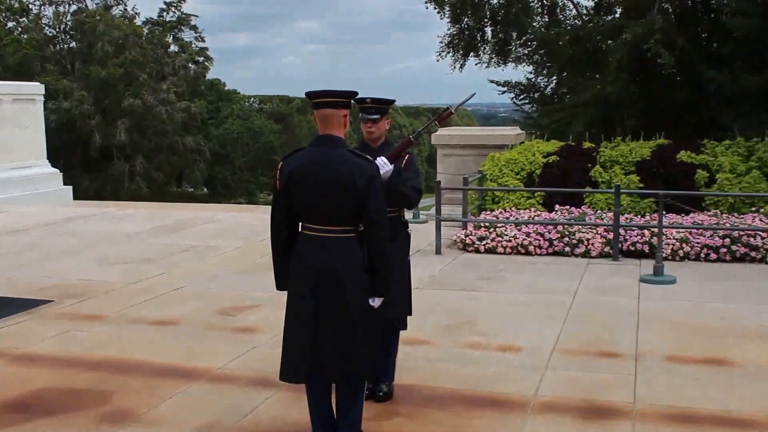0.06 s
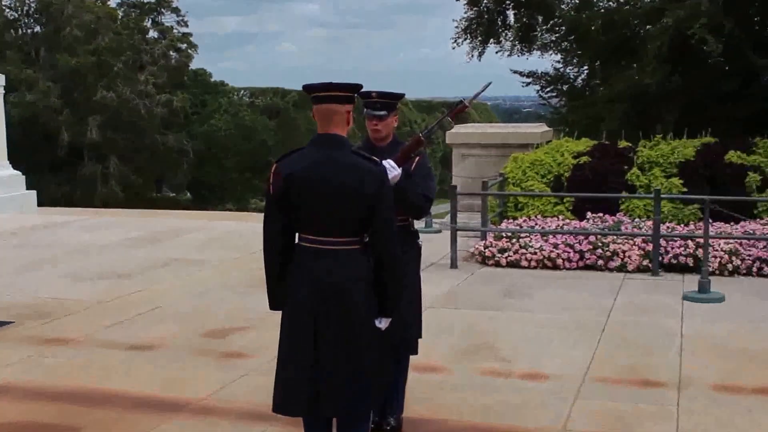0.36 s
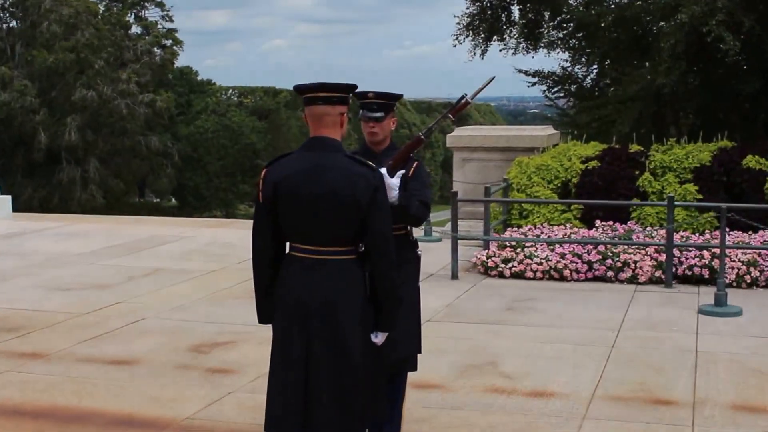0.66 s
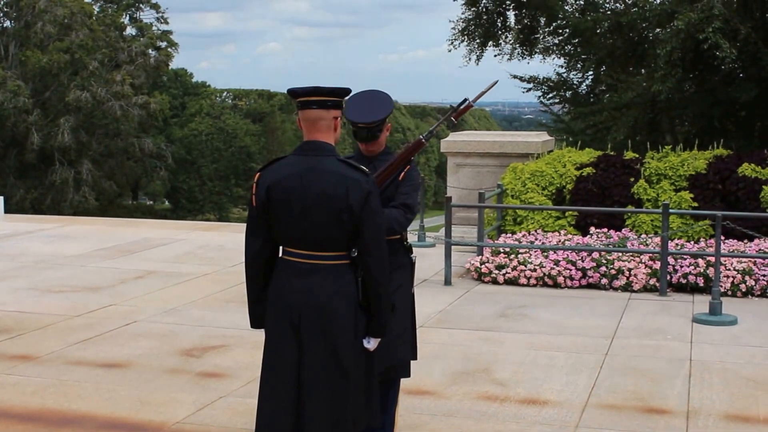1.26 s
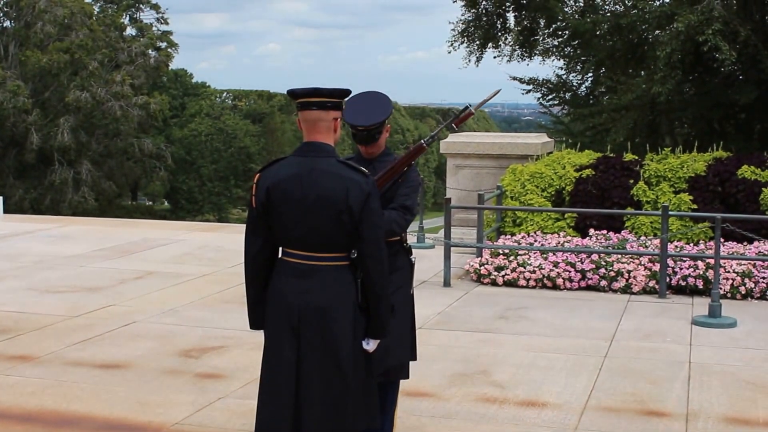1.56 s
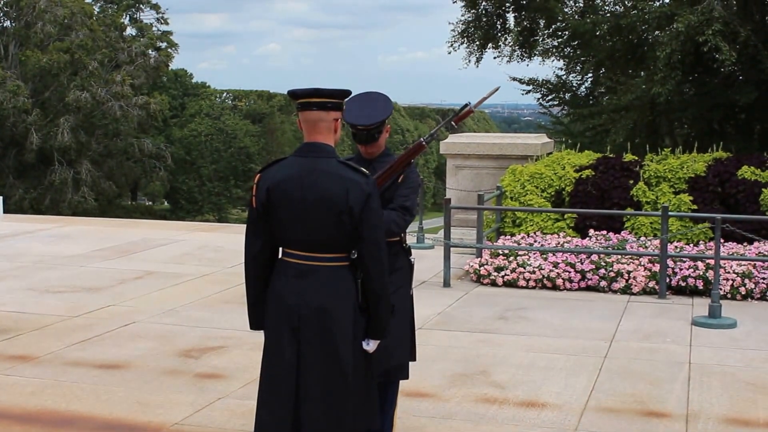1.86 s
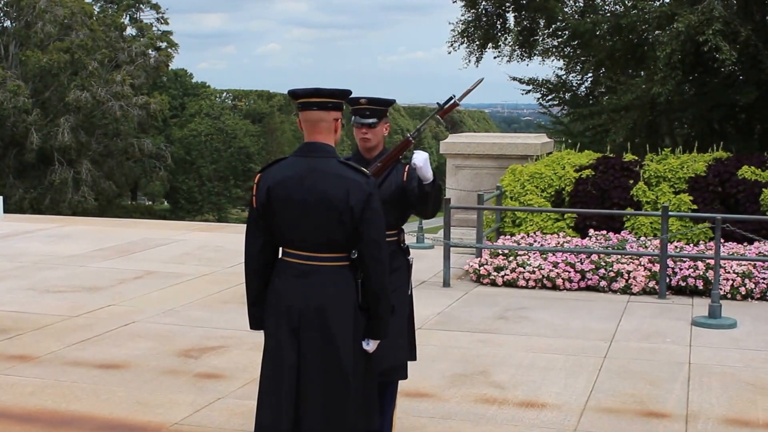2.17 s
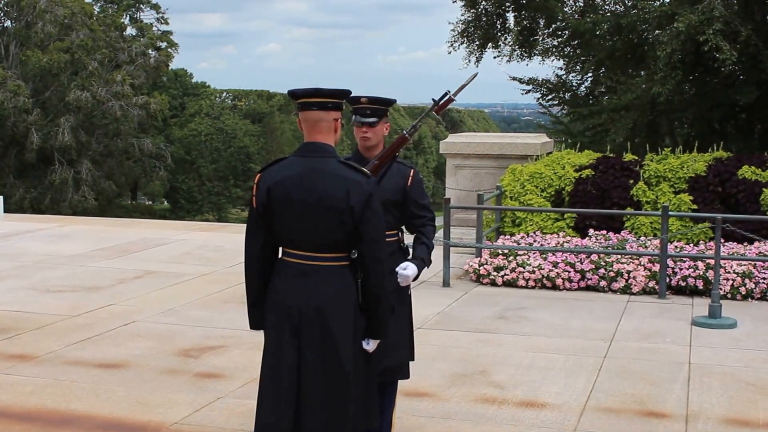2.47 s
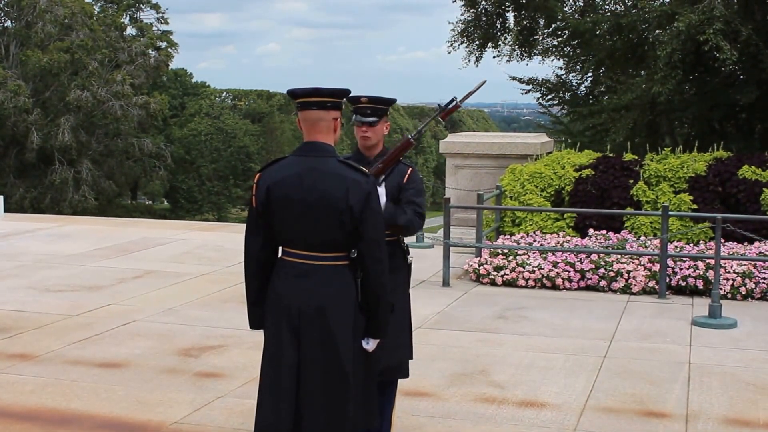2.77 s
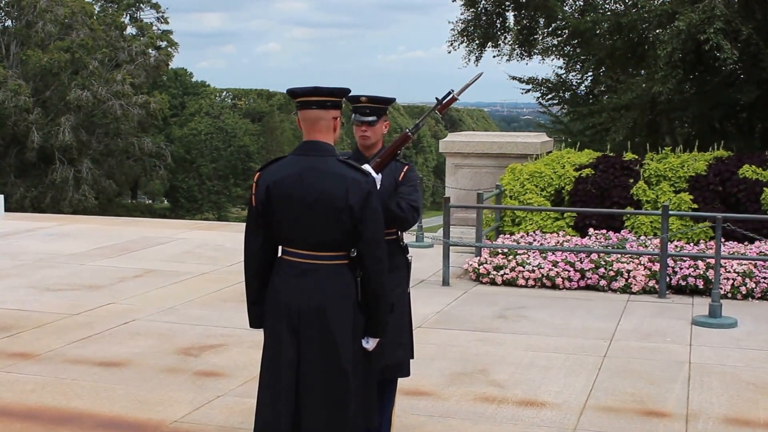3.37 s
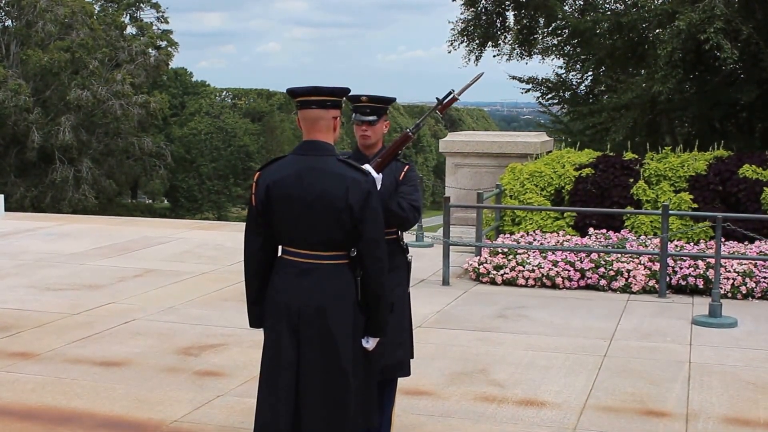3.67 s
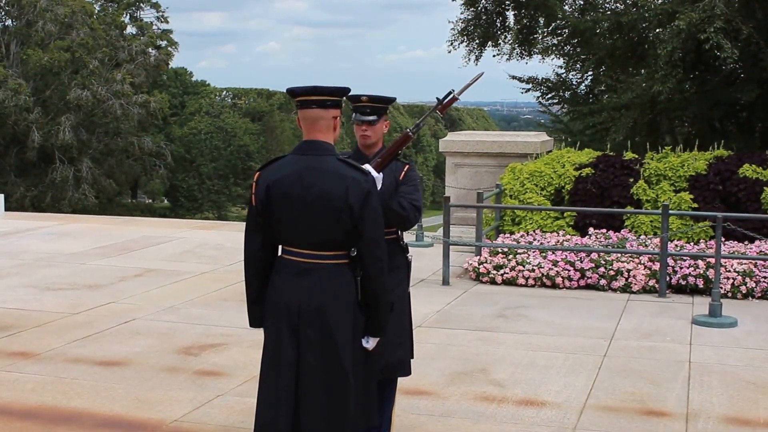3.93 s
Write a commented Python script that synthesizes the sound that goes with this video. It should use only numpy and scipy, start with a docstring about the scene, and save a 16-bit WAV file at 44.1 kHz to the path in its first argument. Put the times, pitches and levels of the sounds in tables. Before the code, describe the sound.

A rifle bolt rattles open and snaps shut with sharp metallic cracks, followed by a gloved slap and one final clack. Each echoes briefly across an outdoor plaza, over wind buffeting the microphone, faint chirps and distant city rumble.

```python
"""An open stone plaza, where a guard handles a rifle. Gloves slap the stock; the bolt clatters open,
slams shut, and a last sharp clack follows, each contact a crack that rings steel and wood.
Stone walls answer a tenth of a second later. Short dry rasps sound to the right and faint birds whistle.
Wind buffets the microphone over a distant city rumble, and a limiter ducks after the loudest blows."""
import sys
import numpy as np
from scipy import signal
from scipy.io import wavfile
from scipy.ndimage import uniform_filter1d

SR = 44100
rng = np.random.default_rng(int(sys.argv[2]) if len(sys.argv) > 2 else 0)


def waveform_to_disk(signal):
    """Save audio, clipped to [-1, 1], as 16-bit WAV at the path in sys.argv[1]."""
    frames = np.transpose(np.atleast_2d(signal))
    scaled = np.clip(frames, -1, 1) * 32767
    samples = np.round(scaled).astype(np.int16)
    wavfile.write(sys.argv[1], SR, samples)


N = 176400
T = np.arange(N) / SR
EDGES = np.geomspace(22, 17000, 24)   # noise bands, Hz
CENTRES = np.sqrt(EDGES[1:] * EDGES[:-1])
BANK = [signal.butter(2, edge, "band", fs=SR, output="sos") for edge in zip(EDGES, EDGES[1:])]
RIFLE_LIKENESS = 0.86   # the rifle's noise is nearly the same in both ears
CHATTER_S = 0.00057   # a blow chatters on before it dies


def from_db(db):
    return 10 ** (np.asarray(db) / 20)


def unit_rms(x):
    return x / np.sqrt(np.mean(x ** 2) + 1e-20)


def per_band(curve):
    """A frequency curve's value at each band centre."""
    hz, values = np.transpose(curve)
    return np.interp(np.log(CENTRES), np.log(hz), values)


def drift(rate_hz):
    """Smooth random wobble with an RMS of 1."""
    step, lead = 40, 2000
    pole = np.exp(-2 * np.pi * rate_hz * step / SR)
    slow = signal.lfilter([1], [1, -2 * pole, pole ** 2], rng.standard_normal(N // step + lead + 2))[lead:]
    return np.interp(np.arange(N) / step, np.arange(len(slow)), unit_rms(slow))


def add(out, start, sound):
    """Mix a sound in at its start in seconds."""
    i = max(int(start * SR), 0)
    out[:, i:i + sound.shape[-1]] += sound[..., :N - i]


def noise_bands(size, likeness):
    """Stereo noise, bands x 2 x size; likeness is the left-right correlation, overall or per band."""
    lead = size // 40
    mid, side = rng.standard_normal((2, 2, 1, size + lead))
    bands = []
    for k, c in enumerate(np.clip(likeness, -.99, .99) * np.ones(len(BANK))):
        white = np.sqrt((1 + c) / 2) * mid[k % 2] + np.sqrt((1 - c) / 2) * side[k % 2] * [[1], [-1]]
        bands.append(signal.sosfilt(BANK[k], white)[:, lead:])
    return np.array(bands)


def colour(eq, tilt_db=0):
    """Band gains for an EQ curve, tilted per octave and rolled off below its first point; total power 1."""
    gain = from_db(per_band(eq) + tilt_db * np.log2(CENTRES)) * np.minimum(CENTRES / eq[0][0], 1) ** 2
    power = np.sum(gain ** 2 * np.diff(EDGES)) * 2 / SR
    return (gain / np.sqrt(power))[:, None, None]


def eq_noise(size, likeness, eq, tilt_db=0):
    """Stereo noise shaped by an EQ curve."""
    return np.sum(noise_bands(size, likeness) * colour(eq, tilt_db), axis=0)


def decay(t, t60):
    """Holds at 1 until t = 0, then falls 60 dB every t60 seconds."""
    return np.exp(-np.log(1000) * np.maximum(t, 0) / t60)


def ring(modes, t, scatter_db=1.5, detune=.002):
    """Struck modes; strength and pitch shift a little with every blow and grip."""
    hz, db, t60 = np.transpose(modes)[:, :, None]
    strength = from_db(db + scatter_db * rng.standard_normal(hz.shape)) * rng.choice([-1, 1], hz.shape)
    hz = hz * (1 + detune * rng.standard_normal(hz.shape))
    return np.sum(strength * np.sin(2 * np.pi * hz * t) * decay(t, t60), axis=0)


# The far city's rumble, then the hiss of traffic and leaves. Each row: frequency in Hz, EQ in dB.
RUMBLE_EQ = [(25, -16), (45, -2.5), (80, 0), (150, -1.5), (260, -4.5), (400, -13.5), (700, -45),
             (1500, -59)]
HISS_EQ = [(290, -11.5), (500, -2), (819, -2), (880, -9.5), (1180, -6.5), (2430, -21), (3920, -22.5),
           (4470, -24), (16000, -41.5)]
# The bed's stereo image. Each row: frequency in Hz, left-right likeness.
BED_LIKENESS = [(100, 1), (700, 0.94), (1300, 0.78), (2400, 0.25), (4500, 0), (9000, 0)]


def city_bed(rumble_db=-34.5, hiss_db=-42):
    """A steady bed of far rumble and hiss, centred in the bass and wide in the treble."""
    rumble = from_db(rumble_db) * colour(RUMBLE_EQ) * (CENTRES < RUMBLE_EQ[-1][0])[:, None, None]
    hiss = from_db(hiss_db) * colour(HISS_EQ)
    return np.sum(noise_bands(N, per_band(BED_LIKENESS)) * np.hypot(rumble, hiss), axis=0)


# The rise and fall of the gusts. Each row: time in seconds, relative level in dB.
GUSTS = [(0, -13.5), (.17, -22.5), (.26, -12), (.68, -22), (.75, -28), (.8, -18.5), (.87, -20), (1.0, -33),
         (1.35, -36), (1.45, -21), (1.6, -33.5), (1.75, -29), (1.9, -48), (2.25, -55), (2.65, -29.5),
         (2.85, -20), (3.15, -20), (3.4, -31.5), (3.66, -22), (3.82, -36.5), (3.875, -21), (4, -35.5)]
# The wind's low end. Each row: frequency in Hz, EQ in dB.
WIND_EQ = [(25, 4), (40, -11), (65, 9.5), (100, 3.5), (160, -0.5), (240, -14), (350, -24), (500, -55),
           (900, -84)]
# Single thumps of air. Each row: centre in seconds, level on the right in dB, pitch in Hz.
BUFFETS = [(.144, -3, 97), (0.217, 1.5, 233), (.270, 3, 162), (.390, -3.5, 172), (0.702, -4, 121),
           (1.463, -10, 146), (3.06, 2.5, 155), (3.701, -2, 197)]


def wind(level_db=-2.5, brightening=0.43, buffet_cycles=0.46):
    """Wind pushes the microphone's two ports against each other: lumpy low noise, brighter in gusts."""
    gust_db = np.interp(T, *np.transpose(GUSTS))
    flutter_db = 3 * drift(21.4)
    force_db = gust_db - gust_db.mean() + flutter_db
    out = np.zeros((2, N))
    for hz, band in zip(CENTRES, noise_bands(N, likeness=-0.64) * colour(WIND_EQ)):
        if hz < WIND_EQ[-1][0]:
            out += band * from_db(brightening * np.log2(hz / 100) * force_db)
    out *= from_db(level_db + gust_db + flutter_db)
    t = T[:SR // 10] - 1 / 20
    for centre, db, hz in BUFFETS:
        thump = -from_db(db) * np.cos(2 * np.pi * hz * t) * np.exp(-(t * hz / buffet_cycles) ** 2)
        add(out, centre + t[0], thump * [[-0.37], [1]])   # a weaker, opposite push on the left
    return out


# Bird calls. Each row: start and length in seconds, first and last pitch in Hz, level in dB.
CHIRPS = [(0.186, 0.11, 4360, 4430, -58), (0.347, 0.049, 4250, 4900, -50), (0.645, .09, 4670, 4450, -59),
          (0.728, 0.12, 3780, 3320, -57), (0.814, 0.11, 4800, 5100, -54), (1.948, 0.044, 4400, 4450, -48),
          (2.641, 0.031, 3920, 3920, -49), (3.63, .04, 4400, 5300, -53)]


def birds(waver_hz=170):
    """Faint, thin whistles that glide and waver."""
    out = np.zeros((2, N))
    for start, length, first_hz, last_hz, db in CHIRPS:
        size = int(length * SR)
        hz = np.linspace(first_hz, last_hz, size) + waver_hz * drift(116)[:size]
        add(out, start, from_db(db) * np.hanning(size) * np.sin(2 * np.pi * np.cumsum(hz) / SR))
    return out


# Dry rasps. Each row: start in seconds, time until the fade in seconds, level in dB.
RASPS = [(1.567, 0.032, -24), (1.721, 0.027, -29), (1.857, 0.024, -26.5), (1.981, 0.062, -24)]
# Their hiss. Each row: frequency in Hz, EQ in dB.
RASP_EQ = [(500, -22), (1200, -5), (1500, -5.5), (2100, 1.5), (2700, -5.5), (4100, -6.5), (5200, -26.5),
           (9000, -25), (15000, -45)]
# Their resonances. Each row: centre in Hz, width in Hz, gain in dB.
RASP_PEAKS = [(2000, 320, 0), (2550, 340, 4.5), (3140, 460, -4), (4126, 150, -2.5)]


def rasps(attack_s=0.015, t60=0.12, hiss_db=-5.5, peaks_db=-5, grain_db=2.5):
    """Grainy bursts of hiss and four noisy resonances, a little to the right."""
    hiss = eq_noise(N, likeness=0.22, eq=RASP_EQ)
    white = rng.standard_normal((2, N))
    peaks = envelope = 0
    for hz, width_hz, db in RASP_PEAKS:
        b, a = signal.iirpeak(hz, hz / width_hz, fs=SR)
        peaks += from_db(db) * signal.lfilter(b, a, signal.lfilter(b, a, white))
    for start, hold, db in RASPS:
        envelope += from_db(db) * np.clip((T - start) / attack_s, 0, 1) * decay(T - start - hold, t60)
    voice = from_db(hiss_db) * hiss + from_db(peaks_db) * unit_rms(peaks)
    return voice * envelope * from_db(grain_db * drift(280)) * from_db([[0], [1.5]])


# The swell of early reflections. Each row: delay in seconds, relative level in dB.
ECHO_SWELL = [(.008, 6.5), (0.029, -1.5), (.062, 2), (.082, -1), (0.1, 2), (.135, -7), (.18, -11.5)]
# The tone of the reverb wash. Each row: frequency in Hz, EQ in dB.
WASH_EQ = [(400, -8), (1000, -9), (2100, 1), (3600, 4.5), (5000, 1), (7000, -1.5), (10000, -19.5),
           (13000, -16), (16000, -40)]
# The length of the tail. Each row: frequency in Hz, T60 in seconds.
TAIL_T60 = [(500, 1.1), (3000, 0.82), (7000, 0.64), (14000, 0.21)]


def plaza_reverb(send, likeness=0.29, pitched_db=-5, dull_hz=5500):
    """Stone echoes swell and die, treble first; most blur into a wash, a dull part keeps the ring."""
    t, mono = T[:SR], send.mean(axis=0)
    delays, db = np.transpose(ECHO_SWELL)
    swell = from_db(np.interp(t, delays, db)) * (t > delays[0])
    tails = swell * decay(t - delays[-1], per_band(TAIL_T60)[:, None])
    tails /= np.linalg.norm(tails, axis=1, keepdims=True)
    # The wash is noise riding the send's power, smeared by each band's tail.
    step = 42   # samples per envelope point
    power = step * uniform_filter1d(mono ** 2, step)[::step]
    envelope = np.sqrt(np.abs(signal.fftconvolve(power[None], tails[:, ::step] ** 2, axes=1)))
    envelope = np.repeat(envelope, step, axis=1)[:, None, :N]
    wash = np.sum(noise_bands(N, likeness) * colour(WASH_EQ) * envelope, axis=0)
    dull_tails = tails / (1 + (CENTRES[:, None] / dull_hz) ** 2)
    response = np.sum(noise_bands(SR, likeness) * dull_tails[:, None], axis=0)
    pitched = signal.fftconvolve(mono[None], response, axes=1)[:, :N]
    return wash + from_db(pitched_db) * pitched


def far_wall(blows, delay_s=.095, level_db=-16.5, band_hz=(1480, 3000)):
    """The far wall throws each blow back once, as a woody slapback."""
    out = np.zeros((2, N))
    woody = signal.butter(1, band_hz, "band", fs=SR, output="sos")
    add(out, delay_s, from_db(level_db) * signal.sosfilt(woody, blows.mean(axis=0)))
    return out


# Cloth hits. Each row: start in seconds, level in dB, T60 in seconds, tilt in dB per octave.
SLAPS = [(0.082, -33, 0.063, -3), (0.317, -42, 0.25, 3.5), (0.435, -32.5, 0.07, 0.5),
         (.449, -32.5, 0.12, 4.5), (0.706, -38, 0.049, 0.5), (.889, -39, 0.067, 2),
         (2.8598, -21, 0.22, 1.5), (2.896, -26.5, 0.088, 7), (2.911, -28, 0.15, 6)]
# The cloth's tone. Each row: frequency in Hz, EQ in dB.
CLOTH_EQ = [(200, 3), (450, -1), (680, 8.5), (1100, -5), (2000, -1.5), (4000, -9.5), (8000, -21),
            (15000, -45)]


def glove_slaps(attack_s=0.0009):
    """Glove and sleeve land softly on the rifle and brush on."""
    out, t = np.zeros((2, N)), T[:SR // 5]
    for start, db, t60, tilt_db in SLAPS:
        cloth = eq_noise(len(t), RIFLE_LIKENESS, CLOTH_EQ, tilt_db)
        add(out, start, from_db(db) * cloth * np.minimum(t / attack_s, 1) * decay(t, t60))
    return out


# Hits on the spring and on a small steel part. Each row: start in seconds, level in dB.
SPRING_HITS = [(2.082, -12.5)]
TINKLE_HITS = [(.447, -43), (3.7172, -27)]
# Their ring. Each row: pitch in Hz, level in dB, T60 in seconds.
SPRING_MODES = [(1900, -8, 0.087), (4835, 3, 0.097), (10700, -8, .07), (11700, -15, 0.19),
                (12195, 5, 0.066)]
TINKLE_MODES = [(4370, 1, 0.12), (7607, -2, .1), (11500, 0, 0.11)]


def small_parts():
    """The spring sings as the bolt goes home, and a small steel part tinkles when shaken."""
    out, t = np.zeros((2, N)), T[:SR // 4]
    for hits, modes in ((SPRING_HITS, SPRING_MODES), (TINKLE_HITS, TINKLE_MODES)):
        for start, db in hits:
            add(out, start, from_db(db) * np.minimum(t / CHATTER_S, 1) * ring(modes, t))
    return out


# Contacts in the action. Each row: start in seconds, levels of crack, receiver, stock and bolt in dB,
# the crack's tilt in dB per octave, attack in seconds.
CLACKS = [(.809, -40.5, -56, -49, -60, -2, 0.00031), (.910, -40.5, -53, -39, -52, -4, .0005),
          (1.1972, -34, -47, -44, -48, -3.5, 0.00035), (1.224, -21, -34, -38, -40, -3.5, 0.00066),
          (1.2363, -16, -11.5, -17, -27, 5, 0.0047), (1.2577, -21, -14, -22, -27, 2.5, 0.00078),
          (1.263, -11, -19.5, -20, -30, -3, .001), (1.267, -17, -11.5, -27, -31, 6, 0.00025),
          (1.278, -21, -13, -25, -28, -2, 0.0012), (1.285, -16, -16, -39, -31, -5.5, 0.0011),
          (1.296, -5.5, -7, -6, -9, 2.5, 0.00044), (2.0124, -19, -23, -32, -29, -7.5, 0.0015),
          (2.046, -19, -30, -22, -39, -1, 0.0025), (2.0642, -10, -17, -19, -1, -6, 0.0014),
          (2.0722, -3, -21, -13, -13, 5, 0.00044), (2.081, -10.5, -3, -13.5, -11, -8.5, 0.001),
          (2.0863, -1.5, -6.5, -1.5, -13, -1, 0.00081), (2.093, -12.5, -25, -11, -40, 13, 0.001),
          (2.713, -38.5, -62, -41, -52, -4.5, 0.00034), (2.9062, -30, -22, -23, -36, 17, 0.0023),
          (2.943, -29, -38, -44, -33, 17, .003), (3.7171, -10, -11, -5.5, -8.5, 5, 0.00044),
          (3.7215, -16, -15.5, -9, -32, -3, 0.00041)]
# The crack's bite. Each row: frequency in Hz, EQ in dB.
CRACK_EQ = [(200, -16), (480, -30), (700, -8), (1050, -9), (1900, 4), (4000, 4), (7000, -0.5), (10000, -12),
            (15500, -25.5)]
# The ring of receiver and barrel, wooden stock, and bolt and spring.
# Each row: pitch in Hz, level in dB, T60 in seconds.
RECEIVER_MODES = [(1560, -18.5, 0.12), (1732, -19, 0.062), (1900, -9.5, .05), (1977, -6.5, 0.061),
                  (2335, -16, 0.078), (2668, -17, 0.064), (2895, -19.5, 0.1), (3590, -7.5, 0.037),
                  (3990, -8, 0.054), (4290, -18, .05), (5830, -9.5, 0.043), (7060, -4.5, 0.025),
                  (11100, -23, 0.089)]
STOCK_MODES = [(697, -12, 0.05), (780, -43, 0.0081), (1127, -7, 0.032), (1896, -8, 0.021),
               (2425, -20, 0.021), (3386, -4.5, 0.032)]
BOLT_MODES = [(2156, -4.5, 0.02), (2504, -6, 0.048), (3430, -20, 0.071), (4090, -6.5, 0.09),
              (7420, -4, 0.016), (9650, -13, 0.036), (10330, -16.5, 0.061), (12200, -16, 0.036)]


def rifle_clacks():
    """Each contact builds into a crack of dense, fast modes plus the ring of receiver, stock and bolt."""
    out, t = np.zeros((2, N)), T[:SR // 12]
    crack_t60 = 0.046 * (CENTRES[:, None, None] / 3000) ** -.15   # the treble dies a little sooner
    fade = decay(t - CHATTER_S, crack_t60)
    for start, crack_db, receiver_db, stock_db, bolt_db, tilt_db, attack_s in CLACKS:
        bands = noise_bands(len(t), RIFLE_LIKENESS) * colour(CRACK_EQ, tilt_db)
        crack = from_db(crack_db) * np.sum(bands * fade, axis=0)
        receiver = from_db(receiver_db) * ring(RECEIVER_MODES, t)
        stock = from_db(stock_db) * ring(STOCK_MODES, t)
        bolt = from_db(bolt_db) * ring(BOLT_MODES, t)
        add(out, start, np.minimum(t / attack_s, 1) * (crack + receiver + stock + bolt))
    return out


def scene():
    """The rifle up front, just right of centre, over its echoes, rasps, birds, wind and the city."""
    blows = rifle_clacks() + small_parts() + glove_slaps()
    aside = rasps() + birds()
    reverb_send = from_db(-11.5) * blows + from_db(-27) * aside
    echoes = plaza_reverb(reverb_send) + far_wall(blows)
    return blows * from_db([[-0.85], [0]]) + echoes + aside + wind() + city_bed()


def record(dry):
    """A limiter ducks on peaks and recovers; what gets past it clips; the top is cut."""
    threshold_db, attack_s, release_db_per_s, cutoff_hz = -3, 0.001, 81, 15900
    peak_db = 20 * np.log10(np.abs(dry).max(axis=0) + 1e-9)
    over_db = np.maximum(peak_db - threshold_db, 0)
    held_db = np.maximum.accumulate(over_db + release_db_per_s * T) - release_db_per_s * T
    pole = np.exp(-1 / (attack_s * SR))
    duck_db = signal.lfilter([1 - pole], [1, -pole], held_db)
    limited = np.clip(dry * from_db(-duck_db), -1, 1)
    return signal.sosfilt(signal.ellip(10, .1, 80, cutoff_hz, fs=SR, output="sos"), limited)


dry = scene()
out = record(dry)
waveform_to_disk(out)
```